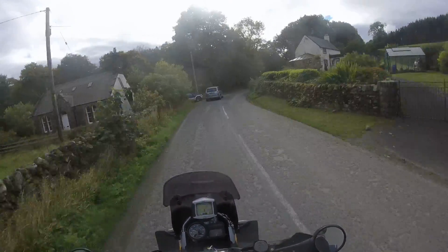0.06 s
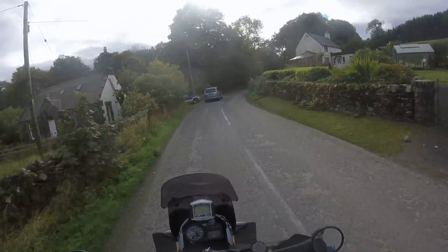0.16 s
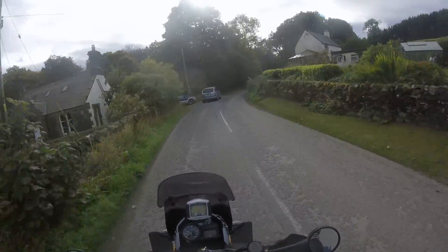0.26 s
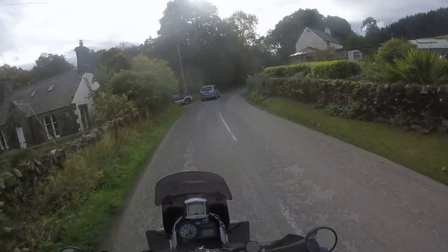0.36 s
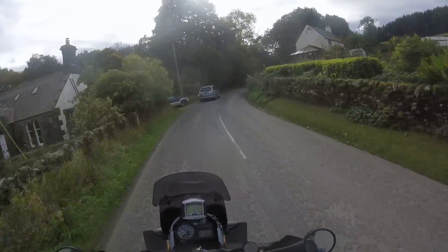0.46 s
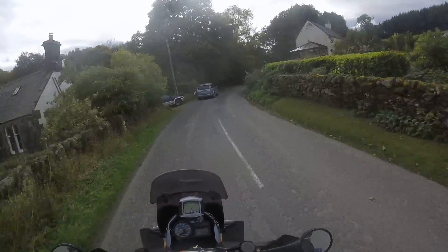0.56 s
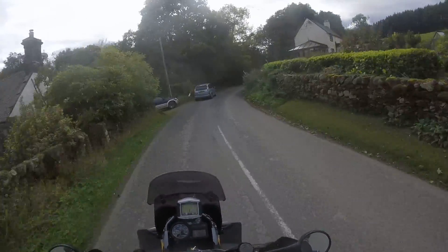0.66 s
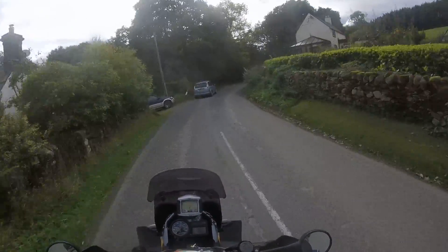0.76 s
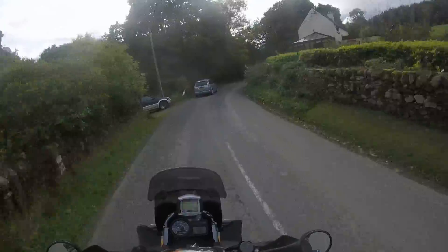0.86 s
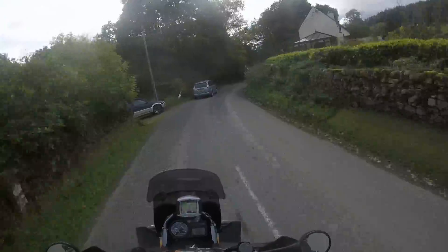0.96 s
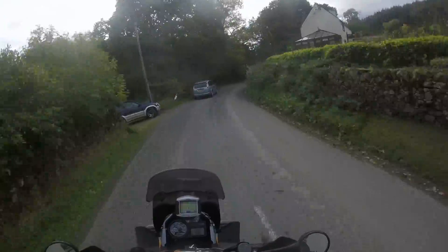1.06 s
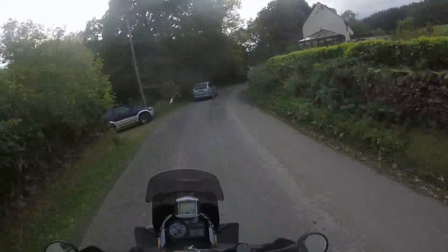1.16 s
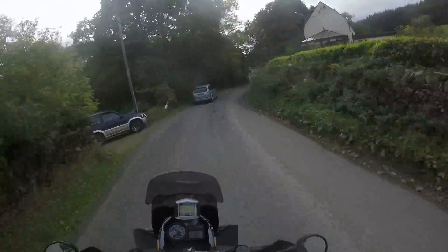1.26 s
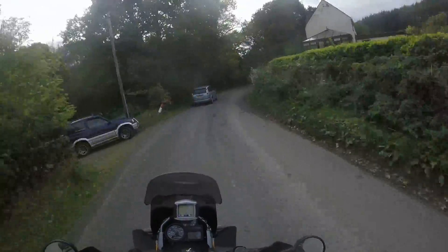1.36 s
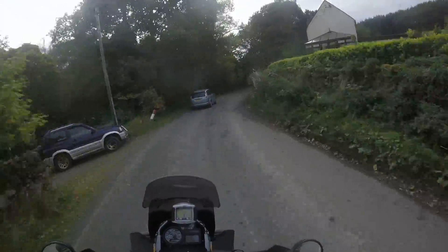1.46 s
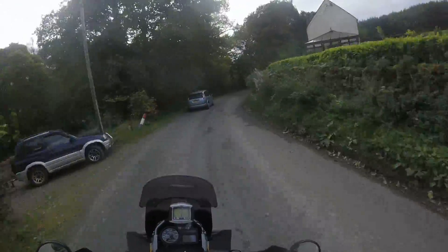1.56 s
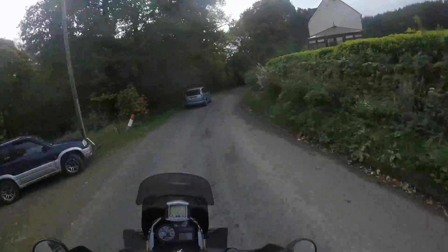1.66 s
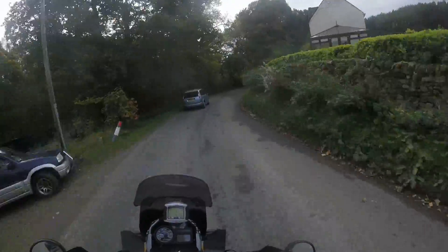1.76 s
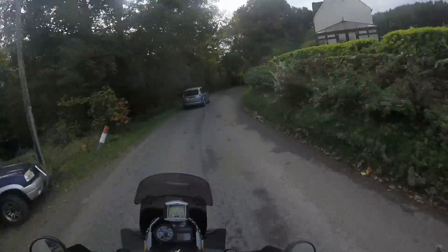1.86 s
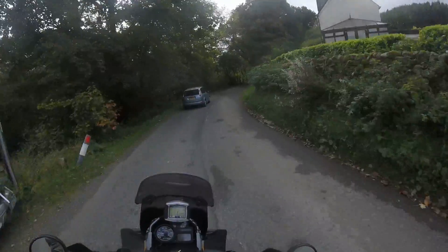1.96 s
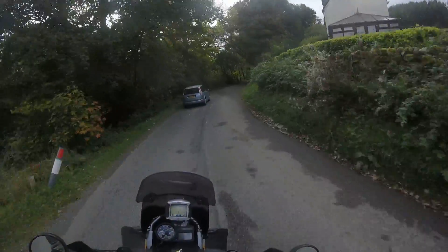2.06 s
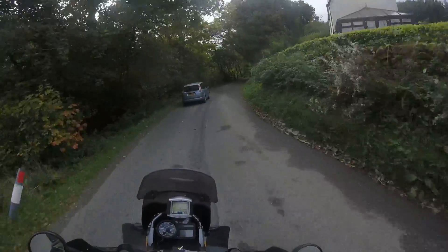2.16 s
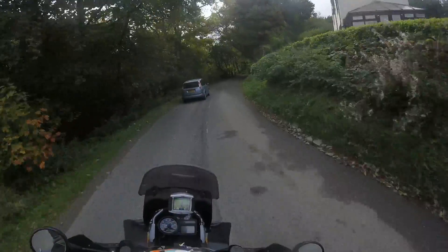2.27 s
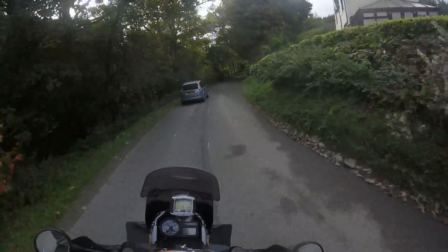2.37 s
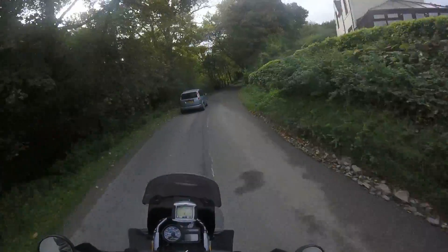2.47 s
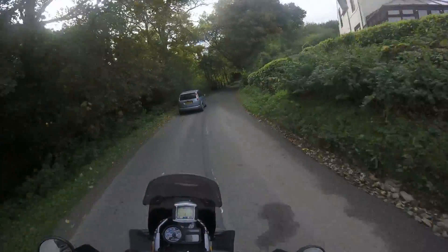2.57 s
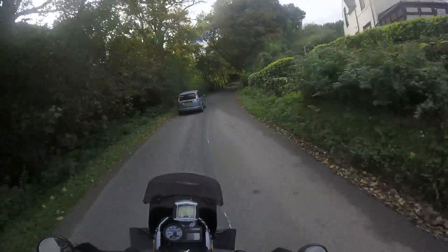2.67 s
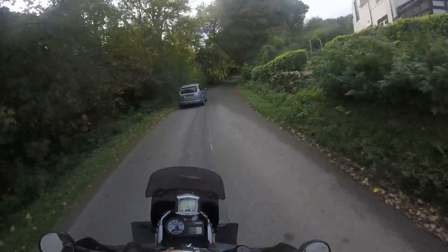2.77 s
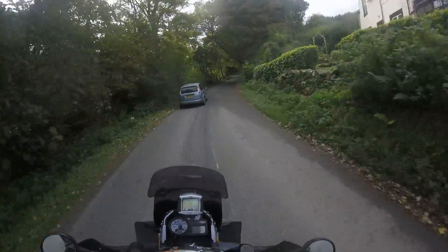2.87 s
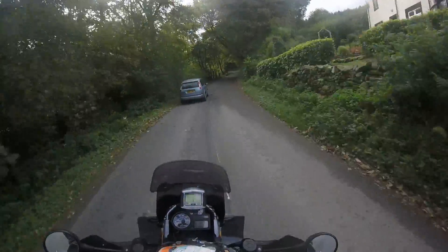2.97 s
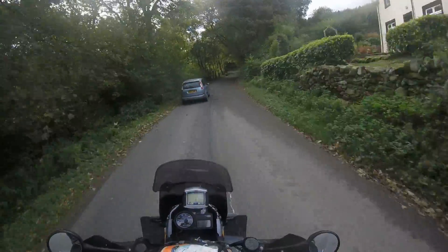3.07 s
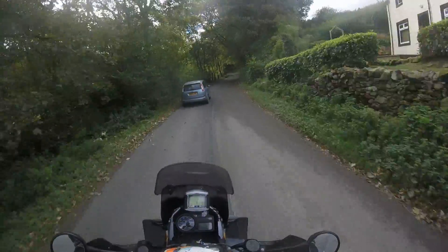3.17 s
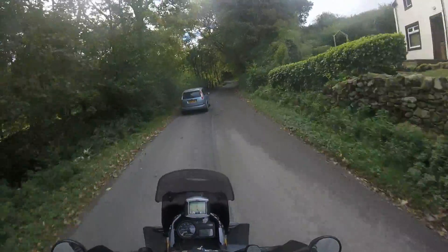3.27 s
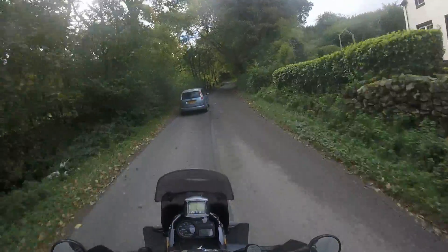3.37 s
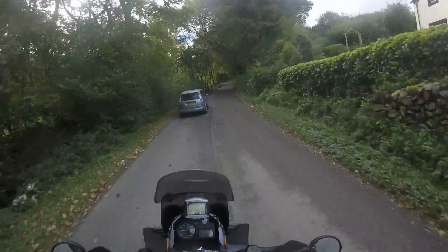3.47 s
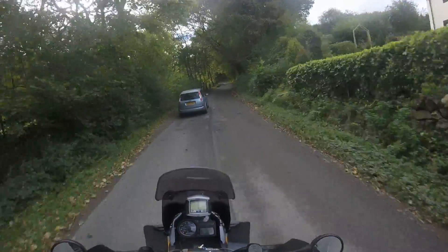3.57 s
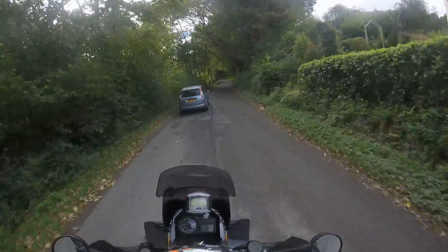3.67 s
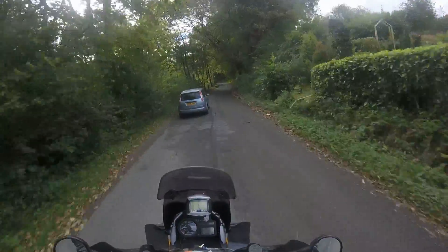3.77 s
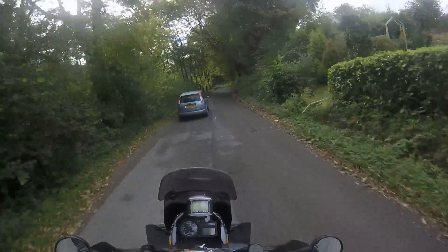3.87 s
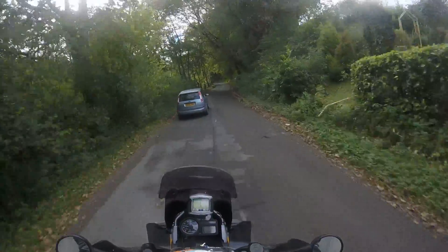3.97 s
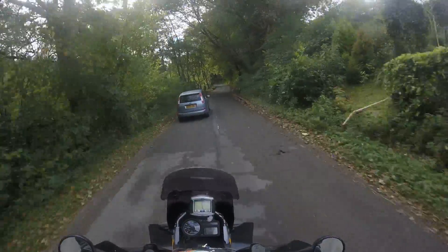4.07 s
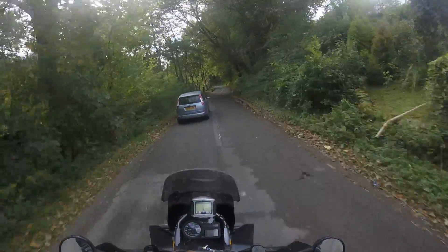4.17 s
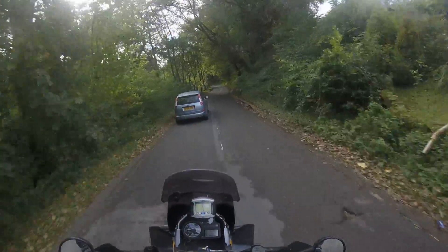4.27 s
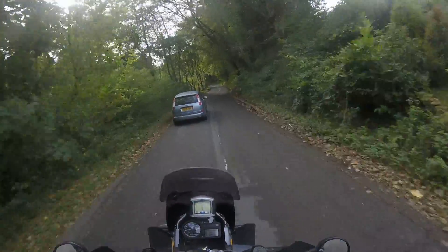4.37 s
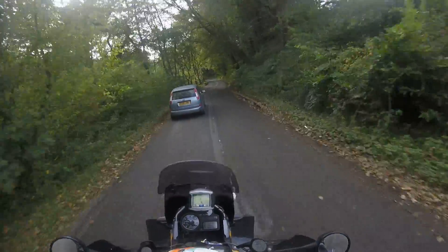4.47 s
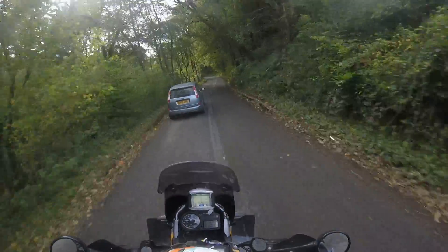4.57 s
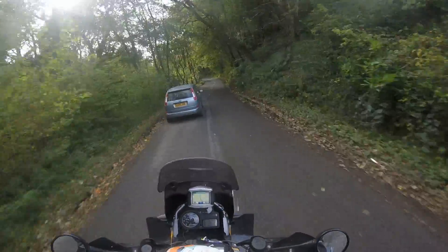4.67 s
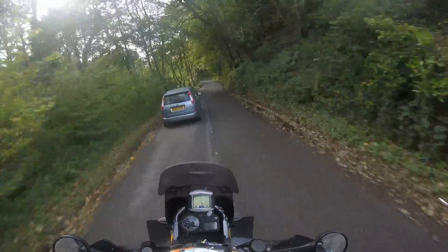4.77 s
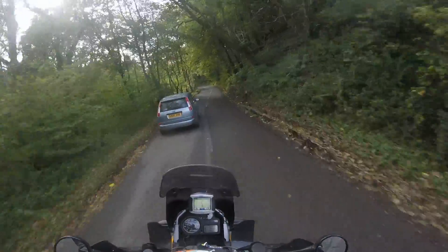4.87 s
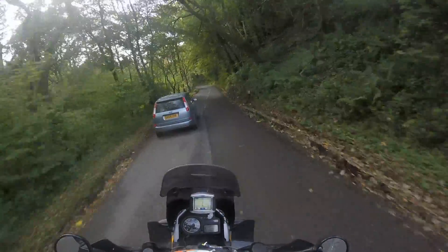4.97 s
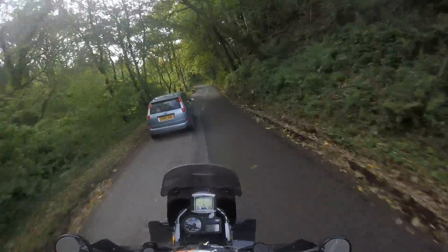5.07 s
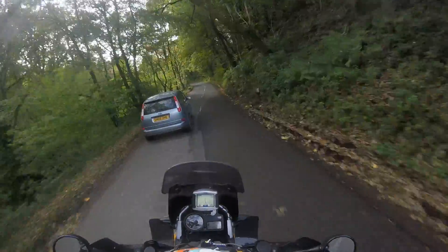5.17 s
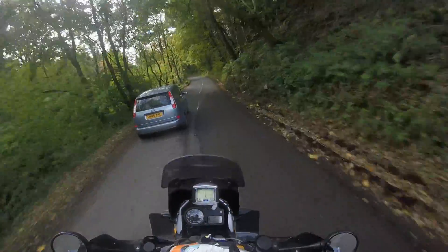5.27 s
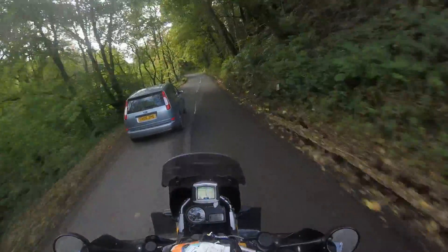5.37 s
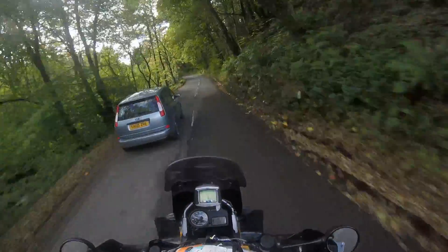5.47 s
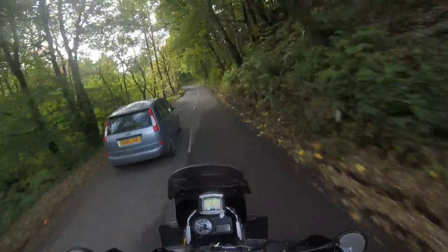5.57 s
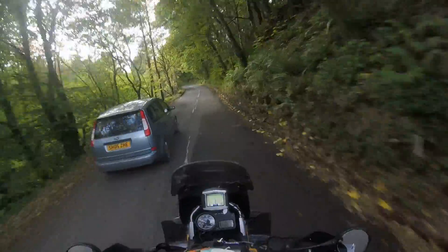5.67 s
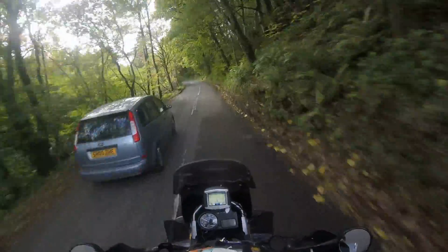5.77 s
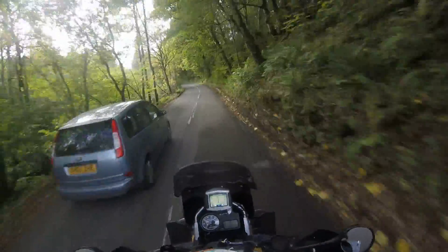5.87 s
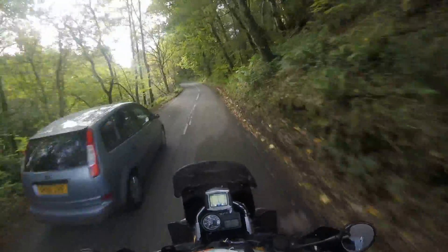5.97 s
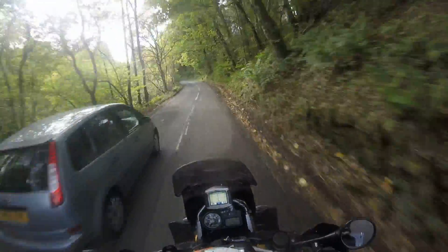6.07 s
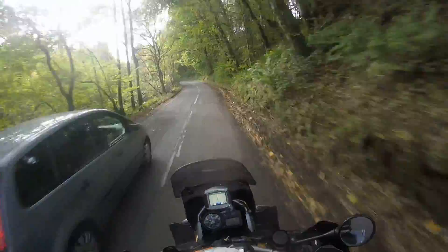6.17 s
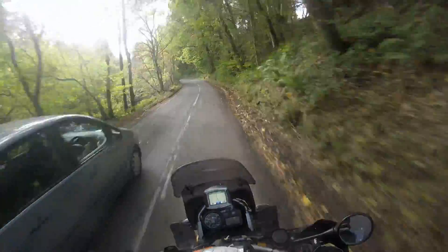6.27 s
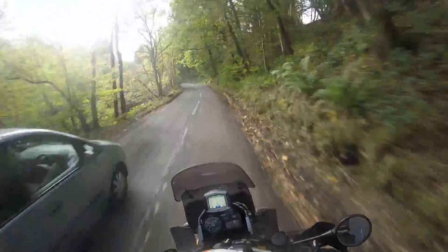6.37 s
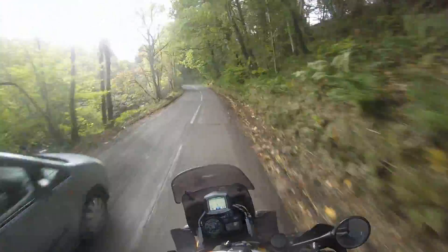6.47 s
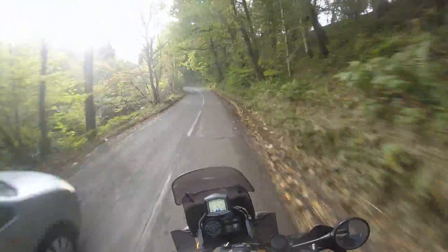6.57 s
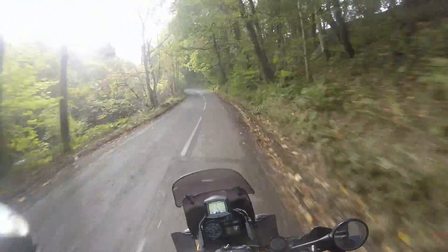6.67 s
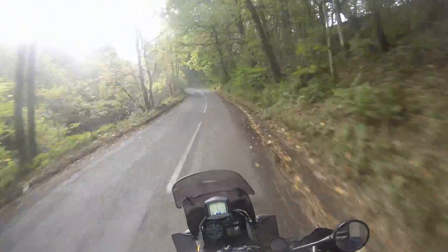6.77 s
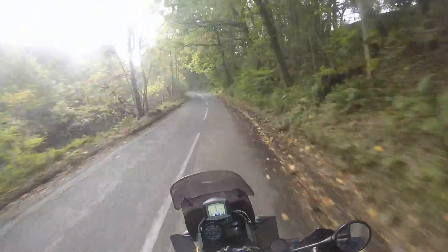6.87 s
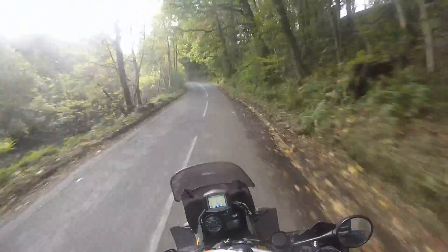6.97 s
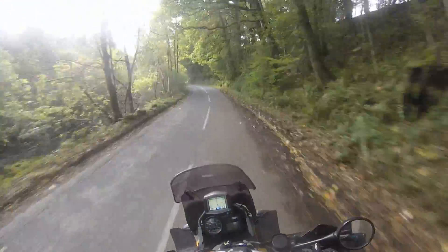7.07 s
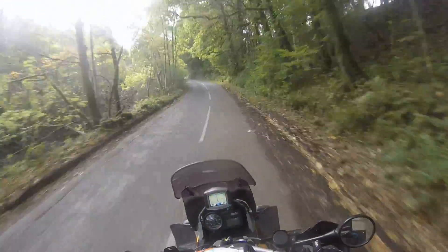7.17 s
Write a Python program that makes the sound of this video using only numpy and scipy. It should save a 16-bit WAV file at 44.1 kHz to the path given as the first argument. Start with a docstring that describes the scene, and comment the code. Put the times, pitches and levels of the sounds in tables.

```python
"""Motorcycle ride through the wind

A twin-cylinder motorcycle on a country road, heard by a camera in a closed case on the rider's helmet.
The bike coasts, holds its speed, then pulls hard: a stack of engine tones plus puffs of gas noise.
Wind, made of coloured noise bands, buffets the case, sings in its cavities and hisses at its edges.
Two quick bright swishes pass early on, and the camera adds a faint hiss of its own."""
import sys
import numpy as np
from scipy import signal
from scipy.fft import rfft, irfft, next_fast_len
from scipy.io import wavfile
from scipy.ndimage import uniform_filter1d, map_coordinates

SR = 44100
rng = np.random.default_rng(int(sys.argv[2]) if len(sys.argv) > 2 else 0)


def pcm_store(signal):
    """Save signal as 16-bit PCM."""
    levels = np.round(np.clip(np.atleast_2d(signal), -1, 1) * 32767)
    wavfile.write(sys.argv[1], SR, levels.astype(np.int16).T)


N = 318843  # length [samples]


def amp(db):
    """Turn decibels into a gain."""
    return 10 ** (np.asarray(db) / 20)


def unit(x):
    """Scale a signal to an rms of 1."""
    return x / np.sqrt(np.mean(x ** 2) + 1e-20)


def curves(rows):
    """Join a table's rows with straight lines: one curve for each column after the time."""
    times, *columns = np.transpose(rows)
    t = np.arange(N) / SR
    return [np.interp(t, times, column) for column in columns]


def wobble(rate):
    """A smooth random curve through `rate` random points a second."""
    points = rng.standard_normal(int(N * rate / SR) + 4)
    return map_coordinates(points, [np.arange(N) * rate / SR])


def lift_db(modes, hz):
    """Add up the bell-shaped boosts or dips [dB] that resonances give at a frequency."""
    return sum(db * np.exp(-((hz - centre_hz) / width_hz) ** 2) for centre_hz, width_hz, db in modes)


def bumps(rows, length_s):
    """Add up bells in time, one for each (time, height) row."""
    t = np.arange(N) / SR
    return sum(height * np.exp(-((t - time) / length_s) ** 2) for time, height in rows)


def filtered(x, response):
    """Multiply the spectrum of x by a gain that depends on frequency."""
    padded = next_fast_len(N + 8192)
    hz = np.fft.rfftfreq(padded, 1 / SR)
    return irfft(rfft(x, padded) * response(hz), padded)[..., :N]


def patchy(noise, spread_db):
    """Make noise louder and softer in random patches of time and pitch."""
    cells = signal.stft(noise, nperseg=512)[2]
    patches = uniform_filter1d(rng.standard_normal(cells.shape), size=8, axis=0)  # smooth across pitch
    patches = uniform_filter1d(patches, size=6, axis=1)  # smooth across time
    return signal.istft(cells * amp(spread_db * unit(patches)), nperseg=512)[1][:N]


def rush(spectrum, modes=(), patchy_db=0):
    """Rushing noise of rms 1: white noise shaped by a colour table and by resonances."""
    noise = rng.standard_normal(N)
    if patchy_db:
        noise = patchy(noise, patchy_db)
    colour_hz, colour_db = np.transpose(spectrum)

    def colour(hz):
        """Gain at each frequency, drawn on a logarithmic pitch scale."""
        base_db = np.interp(np.log(hz + 1), np.log(colour_hz + 1), colour_db, left=-120, right=-120)
        return amp(base_db + lift_db(modes, hz))

    return unit(filtered(noise, colour))


def by_throttle(throttle, settings):
    """Blend three settings: coasting (0), light throttle (1), open throttle (2)."""
    return np.interp(throttle, range(3), settings)


# How strongly each engine tone sounds, before the pipe and other changes:
# (multiple of the cycle rate, coasting level [dB], light-throttle level [dB], open-throttle level [dB])
TONES = [(2, -47, -53, -41), (3, -66, -53, -46), (5, -66, -70, -47), (6, -58, -62, -58), (7, -54, -70, -56),
         (8, -59, -74, -61), (9, -66, -71, -62), (10, -80, -72, -66), (11, -80, -80, -60),
         (12, -80, -84, -59), (13, -80, -86, -61), (14, -80, -82, -68)]
# Exhaust and intake resonances that boost or dip the tones: (centre [Hz], width [Hz], boost [dB])
PIPE_RESONANCES = [(100, 30, 7), (135, 15, -8), (282, 38, 12), (478, 58, 8)]


def engine_tones(cycle_hz, throttle, turns):
    """Tones at multiples of the cycle rate; their balance changes with the throttle."""
    rough_db = by_throttle(throttle, [.5, .8, .3])  # a lean engine fires less evenly than a pulling one
    fired = np.clip(throttle, 0, 1)  # the pipe only lifts the tones when the cylinders burn
    out = np.zeros(N)
    for order, *levels_db in TONES:
        hz = order * cycle_hz
        # coasting tones grow with engine speed and are muffled above 258 Hz
        pumping_db = 1.1 * (cycle_hz - 33) - .4 * np.clip(hz - 258, 0, 40)
        waver_db = rough_db * np.sqrt(order) * wobble(8)  # higher tones waver more
        level_db = by_throttle(throttle, levels_db) + waver_db
        level_db += (1 - fired) * pumping_db + fired * lift_db(PIPE_RESONANCES, hz)
        tone = np.sin(2 * np.pi * (order * turns + rng.random()))
        out += np.sqrt(2) * amp(level_db) * tone
    return out


# Colour of the gas noise in the pipe: (frequency [Hz], relative level [dB])
GAS_COLOUR = [(150, -32), (230, 7), (330, 0), (450, -10), (540, -5.5), (700, -28)]
# Where the gas noise rings: (centre [Hz], width [Hz], boost [dB])
GAS_RESONANCES = [(282, 29, 4.5), (494, 42, 14.5)]


def gas_rasp(throttle, turns):
    """Gas noise in the pipe, puffed once and twice in every engine cycle."""
    puffs = 1 + .5 * np.cos(2 * np.pi * turns) + .5 * np.cos(2 * np.pi * 2 * turns)
    level_db = by_throttle(throttle, [-58, -57, -49])
    return amp(level_db) * puffs * rush(GAS_COLOUR, GAS_RESONANCES)


# How the bike is ridden: (time [s], four-stroke cycle rate [Hz], throttle [0 coasting, 1 light, 2 open])
RIDE_PLAN = [(0, 39.6, .2), (.9, 36.03, 0), (1.5, 33.32, 0), (1.9, 32.07, 0), (2.2, 31.86, .2),
             (2.45, 31.37, 1), (2.8, 31.2, 1), (3.3, 31.46, 1.1), (3.9, 33.1, 1.4), (4.3, 33.85, 1.4),
             (4.55, 35, 1.5), (4.75, 36.1, 2), (5.1, 38.1, 2), (5.4, 40.44, 2), (5.7, 42, 2),
             (6.6, 46.7, 2), (7.23, 50.3, 2)]


def engine():
    """Two uneven firings a cycle: steady tones and puffs of gas share one turning crank."""
    cycle_hz, throttle = curves(RIDE_PLAN)
    turns = np.cumsum(cycle_hz * (1 + .001 * wobble(9))) / SR  # the crank never runs quite evenly
    return engine_tones(cycle_hz, throttle, turns) + gas_rasp(throttle, turns)


# Brief surges and dropouts, scaled by each layer's flicker share: (time [s], height [dB])
FLICKER_SURGES = [(.085, 3), (.155, 1), (.2, 5.5), (.265, 5), (.3, 4.5), (.398, 3.5), (.498, 3), (.64, 3.5),
                  (.775, -13), (.8, 0.5), (.92, 5.5), (2.045, 2.5), (2.778, 4.5), (4.2, -9), (4.445, -8),
                  (4.5, 2.5), (4.603, 0), (5.215, 3.5), (6.535, 2), (6.93, -3), (7.188, 5.5)]


def wind_flicker():
    """A shared restless level [dB], from slow and fast wobbles plus brief surges and dropouts."""
    wobbles_db = .44 * wobble(24) + .83 * wobble(60) + .78 * wobble(150) + .88 * wobble(500)
    return wobbles_db + bumps(FLICKER_SURGES, length_s=.0073)


def layer_gain(law, strength_db):
    """How loud one wind layer is: it follows the wind strength and wanders slowly by itself."""
    calm_strength_db = -38  # the wind strength at which a layer has its calm level
    calm_db, growth, wander_db = law
    return amp(calm_db + growth * (strength_db - calm_strength_db) + wander_db * wobble(5))


# Each law below: (calm level [dB], growth [dB per dB of wind strength], size of slow wander [dB])
BUFFET_LEVEL = (-44, 0.72, 1.8)
BOOM_LEVEL = (-43, 0.94, 1.54)
# Colours of the buffeting and of the case's lowest resonance: (frequency [Hz], relative level [dB])
BUFFET_COLOUR = [(4, -15), (12, -16), (22, 1), (45, -2.5), (70, -4), (95, -2.5), (150, -18.5), (220, -38)]
BOOM_COLOUR = [(60, -45), (95, -11.5), (110, -2.5), (121, -1.5), (133, -6), (150, -19.5), (200, -47)]
# Single hard buffets: (time [s], height [dB])
BASS_THUMPS = [(.08, 4.5), (.42, 0), (.63, 4), (2.2, 1.5), (3.81, 8), (4.21, 4), (4.76, 4), (5.38, 8),
               (6.01, 8), (6.24, 4.5), (6.55, 2.5), (6.99, 5), (7.17, 6.5)]


def bass_buffeting(strength_db, bass_db):
    """Lumpy low noise as eddies push on the case, with its lowest resonance booming along."""
    lumps = amp(2 * wobble(13))
    buffets = layer_gain(BUFFET_LEVEL, strength_db) * unit(lumps * rush(BUFFET_COLOUR))
    boom = layer_gain(BOOM_LEVEL, strength_db) * unit(lumps * rush(BOOM_COLOUR))
    return (buffets + boom) * amp(bass_db + bumps(BASS_THUMPS, length_s=.04))


# (calm level [dB], growth [dB per dB of wind strength], size of slow wander [dB])
ROAR_LEVEL = (-50, 0.86, 0.3)
# Colour of the roar: (frequency [Hz], relative level [dB])
ROAR_COLOUR = [(100, -26), (160, -2), (280, -3), (340, -8.5), (480, -7), (600, -14.5), (900, -15.5),
               (1200, -17), (1600, -50), (2200, -53)]


def wind_roar(strength_db, flicker_db):
    """Patchy low and middle noise that flickers fairly gently."""
    gain = layer_gain(ROAR_LEVEL, strength_db) * amp(.61 * flicker_db)
    return gain * rush(ROAR_COLOUR, patchy_db=.67)


# (calm level [dB], growth [dB per dB of wind strength], size of slow wander [dB])
WHISTLE_LEVEL = (-53.5, 0.86, 1.4)
# Colour of a small air space: (frequency [Hz], relative level [dB])
WHISTLE_COLOUR = [(1000, -45), (1300, -10), (1440, -5.5), (1525, 2.5), (1610, -5.5), (1750, -41),
                  (2000, -48)]
# Moments when the whistle swells: (time [s], height [dB])
WHISTLE_SWELLS = [(3.72, 4), (4.64, 6.5)]


def wind_whistle(strength_db, flicker_db):
    """A small air space sings: a narrow band of noise that swells at times."""
    swell_db = bumps(WHISTLE_SWELLS, length_s=.14)
    gain = layer_gain(WHISTLE_LEVEL, strength_db) * amp(.5 * flicker_db + swell_db)
    return gain * rush(WHISTLE_COLOUR)


# Colour of the wind in the case's cavities: (frequency [Hz], relative level [dB])
CAVITY_COLOUR = [(900, -75), (1250, -25), (1750, -19), (2400, -9.5), (3050, -18), (3600, -18), (4600, -30),
                 (5200, -37.5), (6000, -88)]
# Resonances of the case's air spaces: (centre [Hz], width [Hz], boost [dB])
CASE_RESONANCES = [(2081, 163, 13.5), (2358, 48, 4), (2658, 173, 11), (2913, 180, 13), (4095, 205, 6)]


def case_cavities(strength_db, flicker_db):
    """Air spaces in the case sing: noise with several ringing bands."""
    return amp(strength_db + .79 * flicker_db) * rush(CAVITY_COLOUR, CASE_RESONANCES, patchy_db=.68)


# Each law: (calm level [dB], growth [dB per dB of wind strength], size of slow wander [dB])
HISS_LEVEL = (-59.5, 1.08, .7)
AIR_LEVEL = (-71.5, 1.49, 0.78)
# Colours of the hiss and of its thin top: (frequency [Hz], relative level [dB])
HISS_COLOUR = [(3000, -19), (4500, 2), (5400, -10), (5900, 2.5), (6800, -4), (7800, -8), (8400, -10.5),
               (9100, -6), (10500, -40), (12500, -36)]
AIR_COLOUR = [(7000, -28), (8400, -3), (9100, 1.5), (10500, -6), (12500, -16), (15300, -29)]


def edge_hiss(strength_db, treble_db, flicker_db):
    """Wind hisses at the case's edges: bright noise under a thin top that flickers most."""
    hiss_gain = layer_gain(HISS_LEVEL, strength_db) * amp(treble_db + .98 * flicker_db)
    air_gain = layer_gain(AIR_LEVEL, strength_db) * amp(treble_db + 1.5 * flicker_db)
    return hiss_gain * rush(HISS_COLOUR, patchy_db=.5) + air_gain * rush(AIR_COLOUR)


# Wind strength, as the cavities' level before flicker:
# (time [s], level [dB], extra treble [dB], extra bass [dB])
WIND_STRENGTH = [(0, -26.5, 0, 4), (.14, -30.5, 0.5, 2), (.66, -31, 0.5, 1), (1, -34.5, 2, 0.5),
                 (1.15, -36, 0, -3), (1.55, -39, 0, 0.5), (1.92, -39.5, 0, -1.5), (2.16, -36.5, -1.5, 1.5),
                 (2.35, -39, -0.5, -1.5), (2.52, -37, -1, 0), (3.15, -40.5, 0, -0.5),
                 (3.48, -38, -0.5, 1.5), (4.1, -38.5, 0.5, 0.5), (4.44, -35, 0.5, 1.5), (4.68, -34, 3, 2),
                 (4.85, -32, 1.5, -4.5), (5.25, -30.5, 1, 2.5), (5.7, -27.5, 1, -2), (6, -26.5, 1.5, -3),
                 (6.3, -24, -0.5, -5), (6.6, -24.5, 1.5, 0), (7.23, -23.5, 1, 0.5)]


def wind():
    """Eddies shed at the case: one strength drives every layer, and all but the bass share a flicker."""
    strength_db, treble_db, bass_db = curves(WIND_STRENGTH)
    flicker_db = wind_flicker()
    bass = bass_buffeting(strength_db, bass_db)
    roar = wind_roar(strength_db, flicker_db)
    whistle = wind_whistle(strength_db, flicker_db)
    cavities = case_cavities(strength_db, flicker_db)
    hiss = edge_hiss(strength_db, treble_db, flicker_db)
    return bass + roar + whistle + cavities + hiss


# Short swishes, each with its own peak before they overlap: (time [s], level [dB])
SWISH_PEAKS = [(1.437, -58), (1.452, -54.5)]
# Colour of the swishes: (frequency [Hz], relative level [dB])
SWISH_COLOUR = [(4000, -30), (6500, 6), (9000, -3), (12000, -6), (15300, -12)]


def swishes():
    """Brief puffs of bright hiss, each rising and falling as a bell."""
    peaks = [(time, amp(db)) for time, db in SWISH_PEAKS]
    return bumps(peaks, length_s=.01) * rush(SWISH_COLOUR)


def scene():
    """Add the engine, the wind and the swishes, as one channel."""
    return (engine() + wind() + swishes())[None]


# Colour of the camera's own noise: (frequency [Hz], relative level [dB])
CAMERA_COLOUR = [(6000, -20), (9000, -5), (11000, 0), (13000, -2), (15300, -8)]


def record(dry):
    """The camera adds a faint hiss and keeps nothing above its band limit."""
    top_hz = 15224
    own_noise = amp(-81) * rush(CAMERA_COLOUR)
    return filtered(dry + own_noise, lambda hz: hz < top_hz)


dry = scene()
out = record(dry)
pcm_store(out)
```